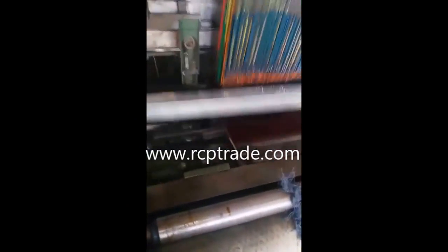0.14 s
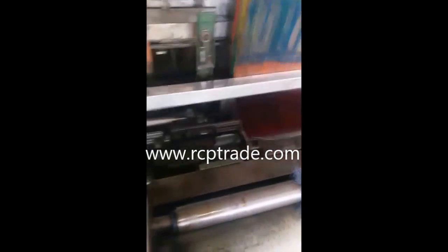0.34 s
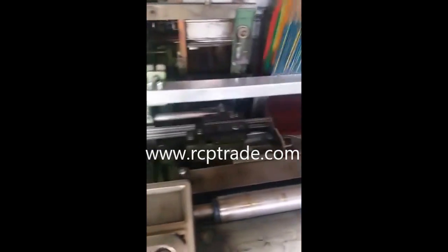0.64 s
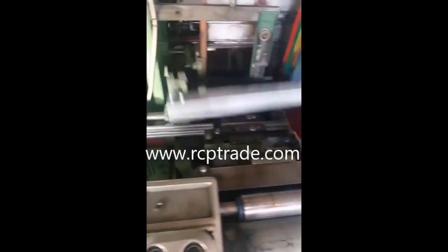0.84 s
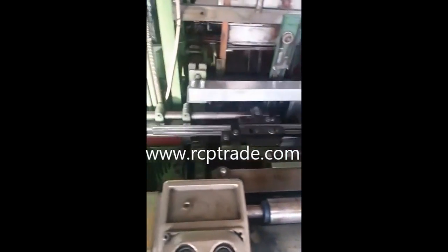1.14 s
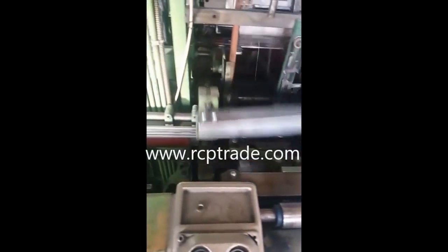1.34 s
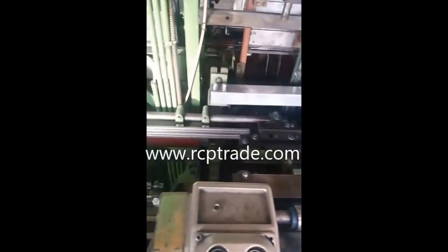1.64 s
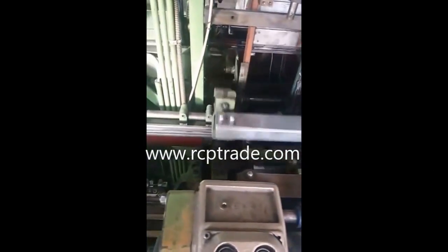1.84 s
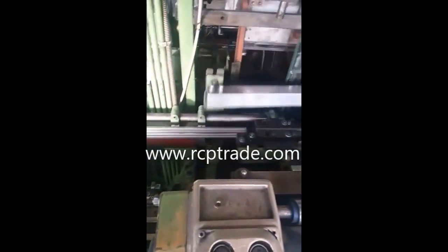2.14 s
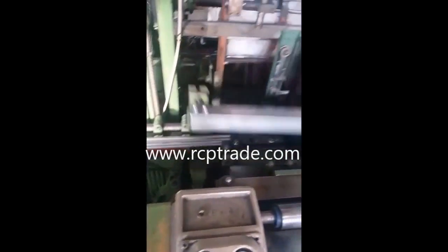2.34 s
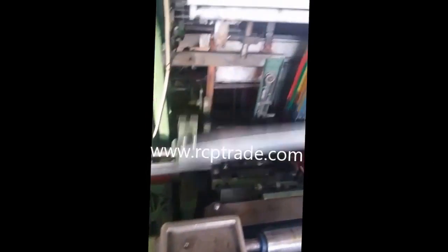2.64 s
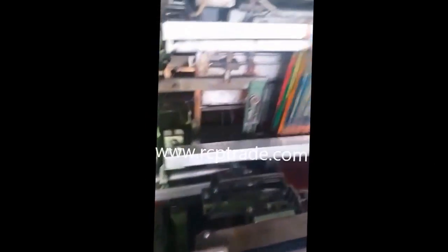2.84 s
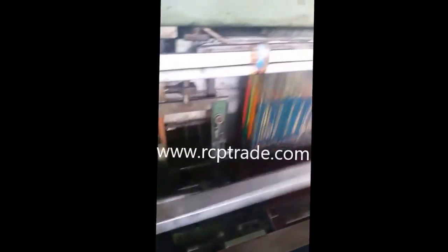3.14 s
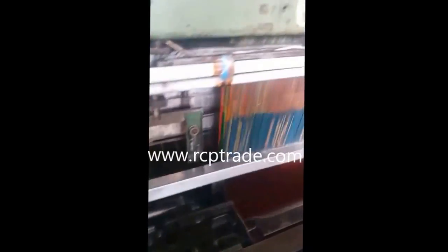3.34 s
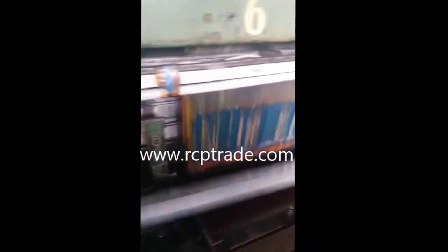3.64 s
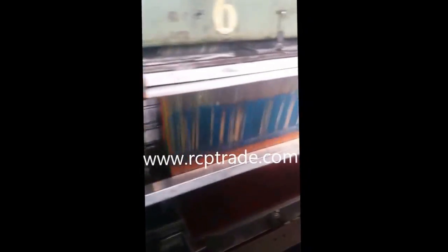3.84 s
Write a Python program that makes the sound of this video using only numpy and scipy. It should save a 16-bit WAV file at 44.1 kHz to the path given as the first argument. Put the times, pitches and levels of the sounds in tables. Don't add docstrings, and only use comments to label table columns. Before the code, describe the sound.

A loom's steady beat sounds faint and dull, then bursts into harsh, full metallic clatter

```python
import sys
import numpy as np
from scipy import signal
from scipy.fft import rfft, irfft
from scipy.io import wavfile
from scipy.ndimage import uniform_filter1d

SR = 44100
rng = np.random.default_rng(int(sys.argv[2]) if len(sys.argv) > 2 else 0)


def unload_audio(sound):
    columns = np.transpose(np.atleast_2d(sound))
    steps = np.round(np.clip(columns, -1, 1) * 32767)
    wavfile.write(sys.argv[1], SR, steps.astype(np.int16))


def voltage_ratio(level):
    return 10 ** (np.asarray(level, float) / 20)


N = 176400
T = np.arange(N) / SR
F = np.maximum(np.arange(N // 2 + 1) * SR / N, 1.0)
SLIP_S = 2.5521

# start_s [s], strength_db [dB]
PICKS = [
    (-.345, 4),
    (0.097, 0.5),
    (0.539, 1),
    (.982, 2.5),
    (1.428, 0.5),
    (1.871, 3.5),
    (2.314, -2.5),
    (2.762, -1),
    (3.198, 0.5),
    (3.642, 2),
]
# delay_s [s], rise_s [s], fall_s [s], centre_hz [Hz], width_oct [octaves],
# level_db [dB over the hall]
PARTS = [
    (0.01, 0.02, 0.038, 5100, 0.76, 10.5),
    (0.029, 0.023, 0.23, 5700, 1.31, 6),
    (.006, 0.0057, 0.022, 13700, 0.47, 12),
    (.005, 0.058, 0.057, 5800, 0.079, 6.5),
    (0.2905, 0.043, 0.032, 5900, 1.36, 7),
    (0.033, 0.016, 0.11, 1400, 0.39, -2),
    (0.13, 0.019, 0.022, 2600, 1, 0),
    (0.13, 0.046, 0.077, 590, 0.66, 0),
    (.12, 0.04, 0.067, 173, 0.72, -0.5),
    (0.16, 0.024, 0.1, 49, 0.41, 8.5),
]
# start_s [s], level_db [dB over the clatter], centre_hz [Hz]
TICKS = [(0.09, 16, 6460), (.585, 1, 9000), (.721, 10, 11000), (.932, 1, 10000), (.98, 5, 5500),
         (1.391, 12, 11000), (1.43, 8, 13500), (1.872, 11, 13900), (2.32, 20, 6500), (2.647, 5.5, 8260),
         (2.729, 4.5, 7000), (2.758, 10, 6500), (2.783, -11, 5000), (2.571, 10.5, 13100),
         (2.952, 10, 12200), (3.193, -5, 4930), (3.215, 14, 5450), (3.252, 13.5, 8300), (3.291, 8, 10400),
         (3.394, 5, 7100), (3.41, 3, 7000), (3.627, 10.5, 5100), (3.654, -7, 12100), (3.671, 2, 5000),
         (3.841, 10, 8850), (3.867, 0, 8000), (3.925, 6, 7560), (2.52, 16, 14500), (2.543, 21, 13000),
         (2.538, 17, 11900), (2.586, 0.5, 5500), (2.6, 3, 9050), (2.713, -1.5, 7300), (2.9, 4, 8500),
         (3.025, 5, 7500), (3.049, 3, 5000), (3.121, 1, 7000), (3.437, 3, 10500), (3.45, 9, 7500),
         (3.461, 7.5, 4800), (3.53, -5, 8000), (3.61, 6, 8450), (3.616, -7, 11000), (3.649, 8.5, 6340),
         (3.908, -7, 7400), (3.935, 7.5, 5540), (1.0, -4, 14000), (1.885, 0, 9000), (.8, 7, 9000),
         (.8, 9, 1900), (1.54, 12, 1900), (1.51, 11, 10000), (.6, 5, 1900), (1.92, 7, 1900),
         (2.764, 8, 10500), (.115, 8, 3500)]
# centre_hz [Hz], width_hz [Hz], level_db [dB]
RINGS = [(238, 70, 2.5), (640, 180, 2.5), (1335, 98, -1.5), (1640, 250, -4), (1840, 38, -5),
         (5470, 250, -1.5), (6560, 81, 3), (7470, 86, 6.5), (3250, 610, -2), (1500, 260, -1)]
# start_s [s], peak_db [dB], pitch_hz [Hz], fall_s [s]
RUBS = [(0.0, -33.5, 115.8, 0.011), (.05, -44.5, 59.3, 0.045), (.165, -37, 58, 0.034),
        (.206, -42, 248, 0.0028), (.255, -37.5, 232, 0.0072), (.483, -31.5, 60, .02),
        (2.372, -23, 87, 0.014), (2.437, -21, 134, 0.0084), (2.462, -18.5, 116, 0.016),
        (2.489, -21.5, 90, 0.011), (2.525, -29, 150, .01)]
# pitch_hz [Hz], density_db [dB per Hz]
SHUT_BODY = [(12, -51), (20, -15), (33, -30), (59, 1), (219, -2), (572, -12.5), (1180, -24), (1850, -20),
             (2500, -32.5), (2950, -43), (7260, -120)]
SHUT_TOP = [(1940, -32), (3300, -6), (5110, -7), (6420, 0), (7230, -10), (9140, -4), (13600, -6),
            (14700, -1.5), (15800, 0.5)]
# time_s [s], level_db [dB]
SHUT = [
    (0, -53),
    (.09, -54),
    (.2, -45.5),
    (.6, -40.5),
    (1.3, -40.5),
    (1.55, -38.5),
    (1.8, -42),
    (2.25, -38.5),
    (2.4, -33),
    (2.55, -25.5),
]
# time_s [s], level_db [dB]
LEAK = [
    (0, -80),
    (.3, -67.5),
    (.6, -64),
    (2.0, -63),
    (2.3, -66),
    (2.36, -49.5),
    (2.55, -45),
]
# time_s [s], from_hz [Hz], kept_share [fraction of lines]
DROPOUTS = [(0.242, 2630, 0.027), (.461, 2800, 0.02), (1.759, 3000, 0.033), (1.994, 3000, 0.034),
            (2.186, 3000, 0.024), (2.273, 3000, 0.02), (2.315, 2600, 0.016), (2.377, 3060, 0.11),
            (2.505, 3170, 0.034), (2.697, 2630, 0.06), (2.738, 2670, 0.08), (3.336, 2800, 0.023),
            (3.51, 2800, 0.032), (3.635, 2850, 0.062), (3.89, 3030, 0.022)]
# delay_s [s after the slip], peak_db [dB]
SNAPS = [
    (-.00015, -1),
    (.0014, -7),
    (.0045, -14),
]
# pitch_hz [Hz], density_db [dB per Hz]
OPEN_BODY = [(12, -67), (30, -40), (61, -10), (228, -3), (443, -8), (651, -6.5), (896, -8), (1740, -0.5),
             (2450, -11.5), (2950, -22), (7260, -100)]
OPEN_TOP = [(1940, -34), (3300, -8.5), (4850, 2), (6810, -5), (8560, -10), (11300, -11.5), (12100, -20),
            (15700, -20)]
# time_s [s], level_db [dB]
OPEN = [
    (2.553, -21),
    (2.575, -15),
    (2.7, -15.5),
    (2.9, -16.5),
    (3.05, -20.5),
    (3.3, -19),
    (3.55, -20),
    (3.7, -18.5),
    (4, -17),
]
# start_s [s], peak_db [dB], pitch_hz [Hz], fall_s [s]
CLANKS = [(2.666, -10.5, 1930, 0.0067), (2.758, -15, 6680, 0.0035), (2.776, -8.5, 1397, 0.0075),
          (2.815, -8.5, 1336, 0.0058), (2.85, -14.5, 311, .02), (2.88, -13, 1500, 0.0054),
          (3.21, -16, 1686, 0.0051), (3.25, -15.5, 2007, 0.016), (3.255, -18, 640, 0.024),
          (3.29, -19, 645, 0.033), (2.736, -11.5, 1614, 0.0085), (3.315, -22.5, 670, 0.013),
          (3.325, -11, 1610, 0.0047), (3.33, -24, 63.3, 0.025), (3.325, -18, 364, 0.02),
          (3.625, -17, 1500, 0.015), (3.675, -11.5, 1015, 0.006), (3.745, -16, 248, 0.016),
          (3.768, -12.5, 245, 0.0092), (3.793, -14.5, 666, 0.0064), (2.778, -10, 1830, 0.0037),
          (3.985, -13, 1117, 0.018), (2.585, -18, 1068, 0.016), (2.74, -20, 950, .01),
          (2.79, -12, 1205, .012), (2.56, -18, 171, 0.013), (3.0, -21, 561, .02), (3.41, -21.5, 620, 0.013),
          (2.6, -15.5, 1800, 0.032), (2.635, -19, 1810, 0.017), (2.705, -14.5, 1780, .01),
          (2.815, -11, 1660, .006), (2.877, -14, 1323, 0.015), (2.86, -20.5, 640, 0.018),
          (3.036, -19.5, 1390, 0.0055), (3.19, -15, 1237, 0.0074), (3.288, -15, 1340, 0.0067),
          (3.34, -14.5, 2146, .006), (3.366, -15, 1040, 0.0092), (3.398, -17, 1740, 0.0077),
          (3.447, -19.5, 1375, 0.014), (3.468, -16, 1720, .006), (3.69, -20, 1712, 0.027),
          (3.766, -18, 1680, .008), (3.8, -18, 232, 0.014), (3.837, -14, 1815, 0.007),
          (3.86, -17, 596, 0.012), (3.937, -16, 247.4, 0.026), (3.99, -15, 1830, .01)]


def curve(rows):
    return voltage_ratio(np.interp(T, *np.array(rows, float).T))


def bell(hz, octaves):
    return np.exp(-0.5 * (np.log2(F / hz) / max(octaves, 0.1)) ** 2)


def unit(x):
    return x / np.sqrt(np.mean(x ** 2))


def colour(spec, rows):
    hz, db = np.array(rows, float).T
    ring_db = sum(g / (1 + (2 * (F - c) / w) ** 2) for c, w, g in RINGS)
    response_db = np.interp(np.log(F), np.log(hz), db, -200, -200)
    return unit(irfft(spec * voltage_ratio(response_db + ring_db), N))


def swell(at_s, rise_s, fall_s):
    d = T - at_s
    return np.exp(np.where(d < 0, -(d / rise_s) ** 2, -d / fall_s))


def knocks(rows, rise_s):
    return sum(voltage_ratio(db) * swell(at + rise_s, rise_s, fall) * np.sin(2 * np.pi * hz * (T - at))
               for at, db, hz, fall in rows)


def walk(rate):
    k = int(SR / rate)
    held = np.repeat(rng.standard_normal(N // k + 1), k)
    slewed = uniform_filter1d(uniform_filter1d(held, k), k)
    return unit(slewed[:N])


def clatter():
    grains_per_s, spread_db, grain_db = 2500, 3.5, -2
    struck = rng.random(N) < grains_per_s / SR
    size = voltage_ratio(spread_db * np.minimum(rng.exponential(size=N), 2.5))
    sign = np.sign(rng.standard_normal(N))
    blur = rng.standard_normal(N)
    return unit(blur + voltage_ratio(grain_db) * unit(struck * size * sign))


def hall():
    flicker_db, flicker_per_s = 1.6, 22
    centres_hz = 30 * 2.0 ** np.arange(10)
    total = np.sqrt(sum(bell(c, 0.45) ** 2 for c in centres_hz))
    spec = 0
    for c in centres_hz:
        band = clatter() * voltage_ratio(flicker_db * walk(flicker_per_s))
        spec = spec + rfft(band) * bell(c, 0.43)
    return spec / total


def picks_in_hall():
    spec, power = hall(), 1.0
    for delay, rise, fall, hz, octaves, db in PARTS:
        env = voltage_ratio(db) * sum(voltage_ratio(g) * swell(at + delay, rise, fall) for at, g in PICKS)
        spec = spec + rfft(env * clatter()) * bell(hz, octaves)
        power = power + np.mean(env ** 2) * bell(hz, octaves) ** 2
    return spec / np.sqrt(power)


def ticks():
    grit = rng.standard_normal(N)
    return sum(voltage_ratio(db) * rfft(grit * swell(at + 0.0012, 0.0016, 0.0035)) * bell(hz, 0.55)
               for at, db, hz in TICKS)


def finger_rubs():
    return knocks(RUBS, 0.0047)


def covered_port(spec):
    body = curve(SHUT) * colour(spec, SHUT_BODY)
    leak_band = bell(1500, 0.47) / (1 + (F / 2950) ** 10)
    leak = curve(LEAK) * unit(irfft(spec * leak_band, N))
    treble = voltage_ratio(-62.5) * colour(spec, SHUT_TOP)
    hiss = voltage_ratio(-69) * colour(rfft(rng.standard_normal(N)), SHUT_TOP)
    return body + leak + treble + hiss


def slip_pop():
    pop_db, pop_hz, fall_s, sag, edge_s = 2.2, 125, 0.004, 0.3, 0.00015
    d = T - SLIP_S
    late = np.maximum(d, 0)
    cycles = pop_hz * late * (1 - sag * np.tanh(late / 0.03))
    ring = np.exp(-late / fall_s) * np.cos(2 * np.pi * cycles - 0.7)
    onset = (1 + np.tanh(d / edge_s)) / 2
    snaps = sum(voltage_ratio(db) * np.exp(-np.abs(d - at) / 0.00008) for at, db in SNAPS)
    return snaps - voltage_ratio(pop_db) * ring * onset


def open_port(spec):
    burst = voltage_ratio(-5) * swell(SLIP_S + 0.031, 0.006, 0.012)
    treble = voltage_ratio(-10.5) * (1 + burst) * colour(spec, OPEN_TOP)
    return curve(OPEN) * (colour(spec, OPEN_BODY) + treble)


def clanks():
    return knocks(CLANKS, 0.0015)


def thin_treble(x):
    out, n = x.copy(), int(0.04 * SR / 2) * 2
    hz = np.arange(n // 2 + 1) * SR / n
    window = np.hanning(n)
    for at, low_hz, share in DROPOUTS:
        s = slice(int(at * SR) - n // 2, int(at * SR) + n // 2)
        lines = rfft(x[s] * window) * (hz > low_hz)
        stand = abs(lines) / (uniform_filter1d(abs(lines), size=60) + 1e-12) ** 0.55
        weak = stand <= np.quantile(stand, 1 - share)
        narrow = window ** (1.4 if at > SLIP_S else 0.5)
        lift = 0.8 * irfft(lines * ~weak, n)
        out[s] += lift - 0.96 * narrow * irfft(lines * weak, n)
    return out


def scene():
    spec = picks_in_hall() + ticks()
    opening = np.clip((T - SLIP_S) / 0.00075, 0, 1)
    heard = (1 - opening) * covered_port(spec) + opening * open_port(spec)
    return (heard + finger_rubs() + slip_pop() + clanks())[None]


def top_cut(x):
    return signal.sosfilt(signal.butter(12, 15870, fs=SR, output="sos"), x)


def record(dry):
    high_pass = signal.butter(3, 47, "high", fs=SR, output="sos")
    low_pass = signal.ellip(8, 0.1, 60, 15800, fs=SR, output="sos")
    band = signal.sosfilt(high_pass, dry[0])
    band = signal.sosfiltfilt(low_pass, np.clip(band, -0.95, 0.95))
    mix = thin_treble(band)[None]
    return top_cut(mix)


dry = scene()
out = record(dry)
unload_audio(out)
```